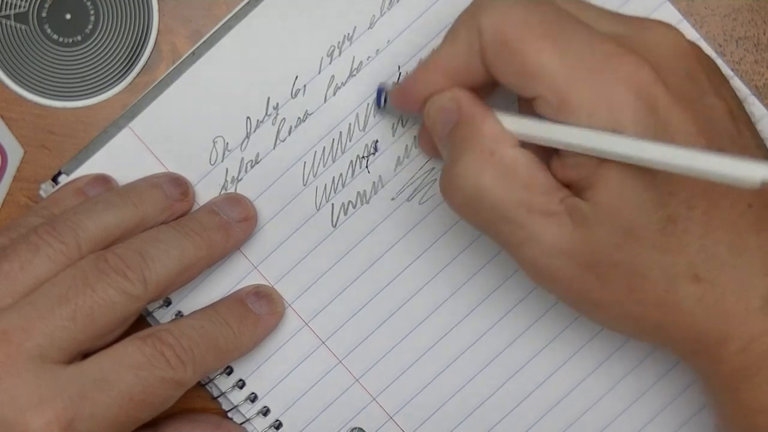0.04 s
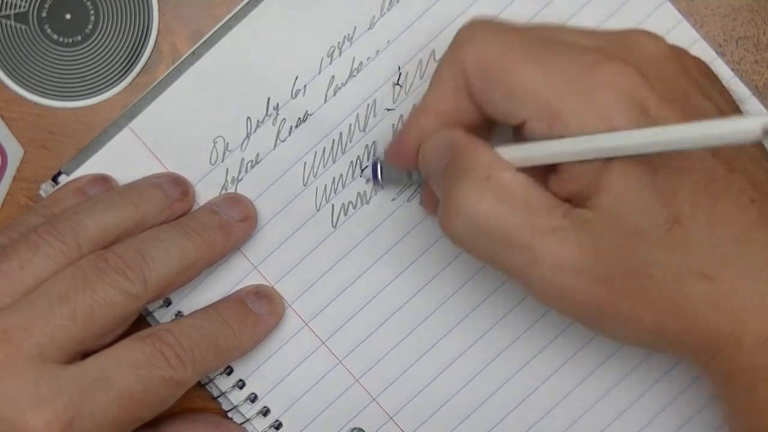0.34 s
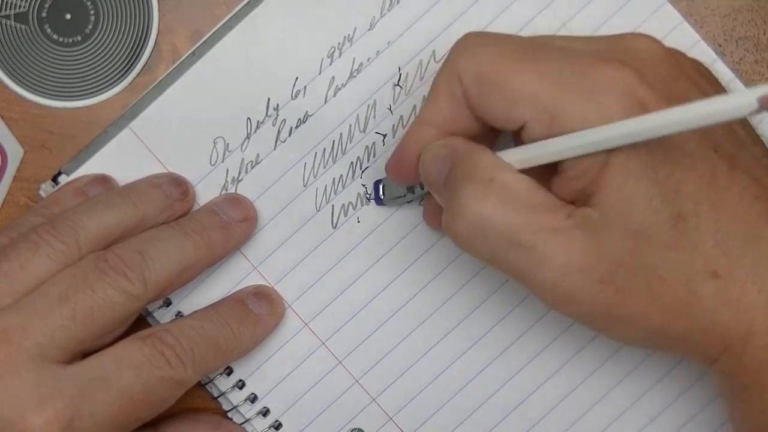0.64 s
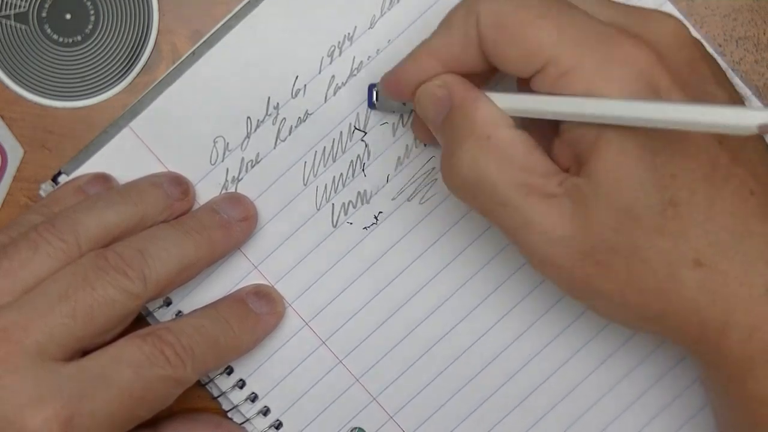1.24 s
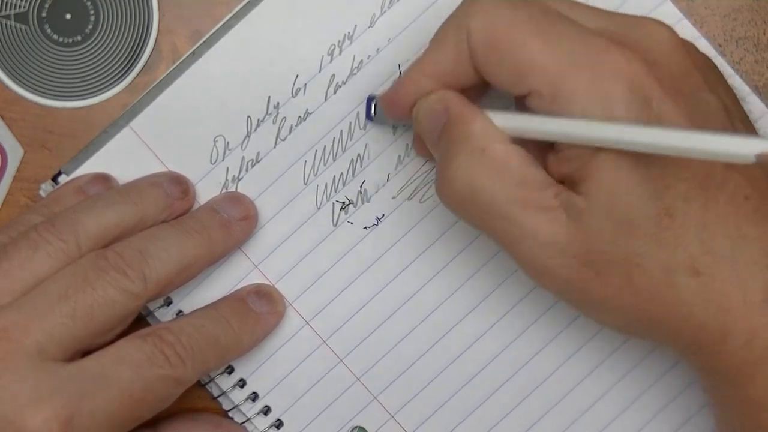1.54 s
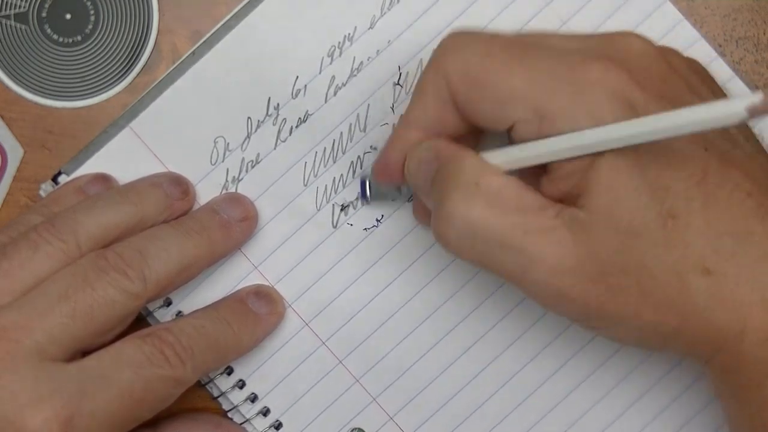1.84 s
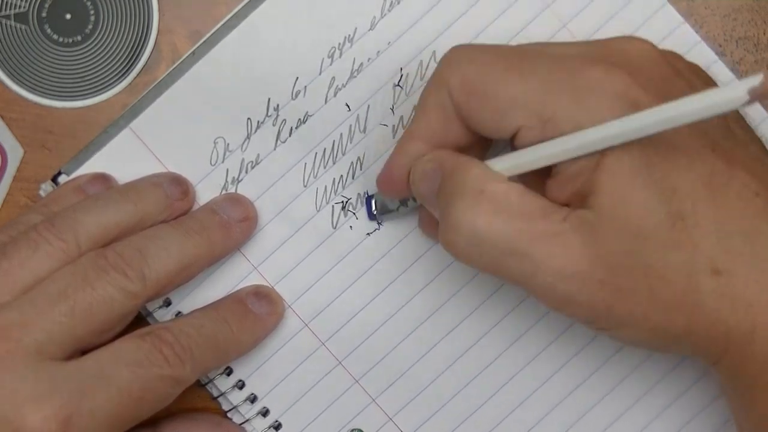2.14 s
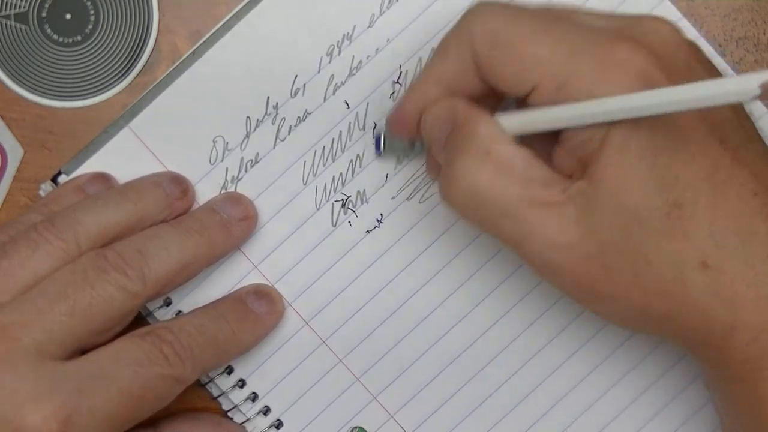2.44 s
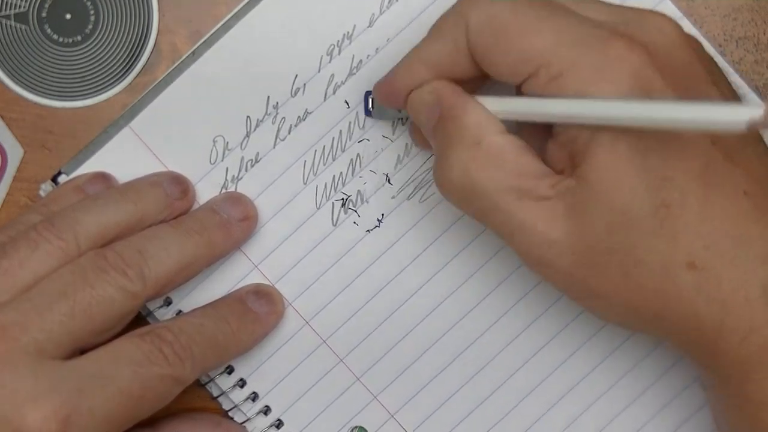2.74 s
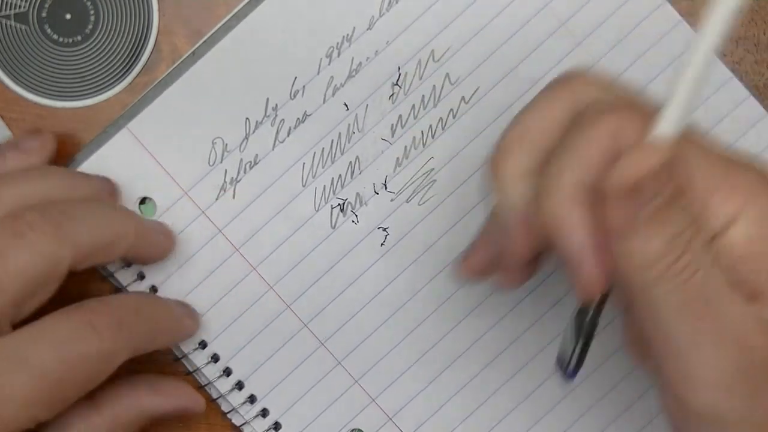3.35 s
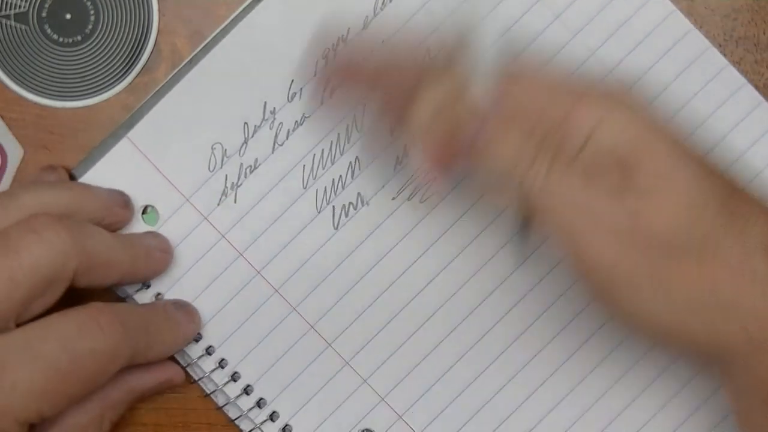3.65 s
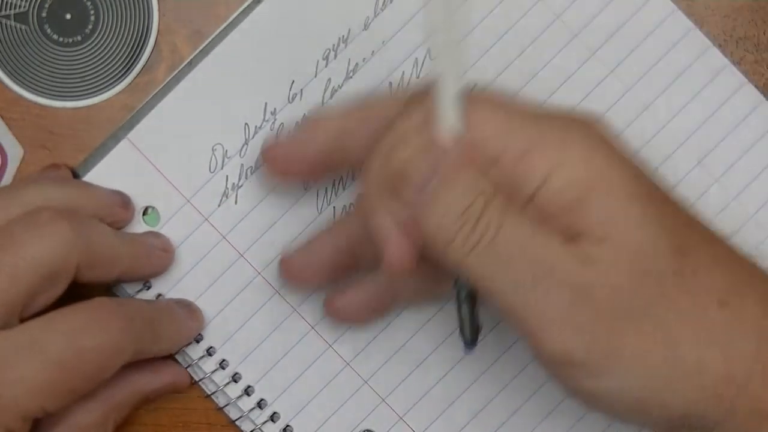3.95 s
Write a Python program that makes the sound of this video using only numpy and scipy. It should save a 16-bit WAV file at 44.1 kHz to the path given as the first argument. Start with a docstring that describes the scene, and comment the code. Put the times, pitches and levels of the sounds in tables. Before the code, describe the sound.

Quick back-and-forth erasing on paper, ending with one brisk brush of a hand.

```python
"""A notebook on a desk in a small, quiet room, with a stereo microphone close to the page.
For three seconds a pencil eraser rubs back and forth, eight strokes a second: pushes rasp and ring
the page, pulls rasp and squeak faintly. Meanwhile the desk thuds softly under the hand and the paper
snags. The rubbing stops, skin slides on the page and the pencil clicks twice in the fingers.
Last, one quick sweep of the hand brushes the crumbs away, a hiss and then a low boom."""
import sys
import numpy as np
from scipy import signal
from scipy.fft import rfft, irfft
from scipy.io import wavfile
from scipy.ndimage import uniform_filter1d

SR = 44100
rng = np.random.default_rng(int(sys.argv[2]) if len(sys.argv) > 2 else 0)


def generate_wav(signal):
    """Clip the signal to [-1, 1] and save it as 16-bit WAV at the path in sys.argv[1]."""
    frames = np.transpose(np.atleast_2d(signal))
    scaled = np.clip(frames, -1, 1) * 32767
    pcm = np.round(scaled).astype(np.int16)
    wavfile.write(sys.argv[1], SR, pcm)


N = 176400
T, HZ = np.arange(N) / SR, np.fft.rfftfreq(N, 1 / SR)

# Pulls of the eraser. Each row: start in seconds, relative squeak level in dB, squeak pitch in Hz.
PULLS = [(-.04, -67.5, 3194), (0.214, -64.5, 3190), (0.467, -62.5, 3234), (0.719, -63.5, 3216),
         (0.97, -67.5, 3140), (1.214, -62.5, 3170), (1.452, -62, 3200), (1.72, -60.5, 3220),
         (1.978, -63.5, 3140), (2.221, -63.5, 3110), (2.46, -62, 3130), (2.695, -60, 3150),
         (2.93, -63.5, 3150)]
# Pushes of the eraser. Each row: start in seconds, rasp level in dB.
PUSHES = [(0.091, -55.5), (0.341, -54.5), (0.594, -55.5), (0.846, -54.5), (1.086, -52.5), (1.334, -54.5),
          (1.597, -55.5), (1.842, -54.5), (2.096, -52.5), (2.344, -55.5), (2.579, -54.5), (2.814, -54.5),
          (3.058, -54.5)]
PULL_S, PUSH_S, PULL_DB = .076, .074, -57.3  # stroke lengths, and the rasp of a pull
LEAD_S, LAG_S = .011, .014  # the rubber also moves just before and after each stroke
SQUEAK_GLIDE = .6  # rise in pitch, as a share per second

# Tone colours of the noises. Each row: frequency in Hz, relative spectral density in dB.
HUSH_COLOUR = [(22, -15), (40, 2.5), (170, 1), (300, -0.5), (1500, -10.5), (8000, -19.5), (12000, -30),
               (15700, -28)]
PULL_COLOUR = [(60, -20), (330, 6), (950, 1.5), (1450, 6), (2200, 1), (2900, 1), (3900, -1.5), (7500, -2),
               (11000, 0.5), (13000, -5), (15700, -21)]
PUSH_COLOUR = [(60, -22), (330, 4.5), (580, -0.5), (750, 2), (1450, -1.5), (2900, 0), (5800, -1),
               (6550, -3.5), (8500, -1), (10200, 3.5), (11400, -4), (12400, 0), (13200, -6.5), (15700, -12)]
GRATE_COLOUR = [(100, -26), (700, -4.5), (1220, -2.5), (1650, -7.5), (1870, 9), (2200, -16.5), (2660, 4),
                (3400, -11.5), (5000, -24.5), (10000, -5), (15700, -20.5)]
SLIDE_COLOUR = [(60, -11), (300, -1.5), (450, 7.5), (1100, 2.5), (2000, -1), (4000, -2.5), (7000, -6),
                (11500, -7), (15700, -17)]
TICK_COLOUR = [(300, -25), (1900, -12), (2600, 0), (4000, 3), (8000, -8), (11000, -12), (15700, -20)]
HISS_COLOUR = [(200, -38), (1200, -1.5), (2500, 3), (4400, 2), (6600, -2.5), (9400, 5), (12000, 3),
               (14000, -3.5), (15700, -8)]
WEIGHT_COLOUR = [(60, -18), (170, -4), (330, -12), (520, -5), (630, -9), (750, -1.5), (1120, -8.5),
                 (1450, -7.5), (2050, -2.5), (2750, -8), (3650, -9), (4400, -9.5), (7000, -15),
                 (15000, -36)]

# Modes of the things on the desk. Each row: frequency in Hz, relative level in dB, seconds to fall 60 dB.
RUBBED_PAGE_MODES = [(750, -1.5, 0.036), (1030, -3, 0.042), (1230, 1, 0.034), (1983, 1, 0.034),
                     (2625, -1, 0.023)]
DESK_MODES = [(130, -10, 0.08), (174, 0, 0.105), (276, -14, 0.05), (423, -5, 0.09)]
PENCIL_MODES = [(2540, 1, .02), (3470, -6, 0.016)]
KNOCK_MODES = [(440, -10, .12), (540, -9, 0.12), (760, -13, .04)]
SWEPT_PAGE_MODES = [(1680, -4, 0.22), (1860, 0, 0.3), (2047, -2, 0.26), (2190, -2, 0.25), (3555, -5, .12)]

# Thuds of the hand and clicks of the pencil. Each row: start in seconds, strength in dB.
THUDS = [(.243, -51), (.49, -52.5), (0.618, -50.5), (0.714, -49), (.988, -46.5), (1.012, -51),
         (1.081, -52.5), (2.09, -50), (2.224, -47), (2.357, -48), (2.953, -50), (3.052, -45.5),
         (3.123, -46.5), (3.194, -48.5), (3.256, -47), (3.455, -44), (3.561, -47.5)]
CLICKS = [(3.453, -42.5), (3.471, -52.5)]
# Paper snags. Each row: start in seconds, level in dB, centre in Hz, decay time in seconds.
SNAGS = [(.146, -48, 1000, 0.0055), (.396, -50, 940, 0.0087), (.9, -50.5, 1100, 0.006),
         (1.138, -49, 1150, .008), (2.158, -45, 7000, .003), (2.595, -50, 9980, 0.0054),
         (2.835, -47.5, 10000, .004), (2.857, -50.5, 1180, 0.009), (3.084, -48, 2500, 0.0023),
         (3.116, -44, 5700, 0.0042), (3.312, -49, 2000, 0.0025), (3.561, -49, 2000, 0.0042),
         (3.708, -24, 2900, 0.0018), (3.9, -56.5, 10000, .005)]

# The hand's slide and the three layers of its sweep. Each row: time in seconds, relative level in dB.
SLIDE_LEVEL = [(0, -65.5), (3.15, -63.5), (3.2, -55.5), (3.245, -59), (3.33, -56), (3.39, -61.5),
               (3.555, -60), (3.575, -55.5), (3.8, -62), (4, -67.5)]
HISS_LEVEL = [(3.56, -74), (3.61, -55.5), (3.64, -43.5), (3.665, -38), (3.688, -31), (3.712, -35.5),
              (3.73, -49.5), (3.76, -60), (3.83, -68)]
WEIGHT_LEVEL = [(3.58, -61.5), (3.655, -63), (3.683, -38.5), (3.709, -32), (3.72, -33.5), (3.73, -46.5),
                (3.77, -54), (3.83, -67)]
BOOM_LEVEL = [(3.555, -72), (3.575, -54), (3.62, -59), (3.655, -76), (3.685, -52), (3.703, -39.5),
              (3.722, -41), (3.745, -60), (3.8, -72)]
# The hollow under the hand. Each row: open pitch in Hz, closed pitch in Hz, width in Hz, gain in dB.
HOLLOW_RESONANCES = [(1503, 2150, 560, -4.3), (3097, 3740, 480, -6.3)]
CLOSE_FROM_S, CLOSE_TO_S = 3.682, 3.708

# The room's tail. Each row: frequency in Hz, seconds to fall 60 dB.
ROOM_DECAY = [(150, 0.59), (1000, 0.3), (8000, 0.38), (15000, 0.13)]
# Stereo image at the microphone. Each row: frequency in Hz, left-right likeness from -1 to 1.
WIDE_IMAGE = [(130, 0.17), (300, -0.55), (15000, -0.32)]
RUB_IMAGE = [(100, .2), (300, -0.55), (1400, 0.35), (3100, 0.92), (15000, 0.69)]
NARROW_IMAGE = [(3100, 1), (7000, 0.78)]
# The microphone's balance. Each row: frequency in Hz, left minus right in dB.
BALANCE = [(60, 4.5), (400, 1.1), (7500, 0), (15000, -4)]


def amp(db):
    """Decibels to gain."""
    return 10 ** (np.asarray(db) / 20)


def unit(x):
    """Scales to rms 1."""
    return x / np.sqrt(np.mean(x ** 2) + 1e-20)


def read(points, hz=HZ):
    """Reads a table on a log-frequency axis."""
    f, value = np.transpose(points)
    return np.interp(np.log(hz + 1), np.log(f + 1), value)


def level(points):
    """Gain over time from (s, dB) points, silent outside them."""
    s, db = np.transpose(points)
    return amp(np.interp(T, s, db)) * (T >= s[0]) * (T <= s[-1])


def add(mix, start, sound):
    """Mixes a sound in at a time in seconds."""
    part = mix[..., max(round(start * SR), 0):][..., :sound.shape[-1]]
    part += sound[..., :part.shape[-1]]


def wander(hz):
    """Random drift of rms 1, mostly slower than hz."""
    return unit(irfft(rfft(rng.standard_normal(N)) / (1 + (HZ / hz) ** 4), N))


def stereo(x, image, colour_db=0):
    """Colours two unrelated signals and blends them to a given left-right likeness."""
    mid, side = rfft(x) * amp(colour_db)
    likeness = np.clip(read(image), -.99, .99)
    mid, side = mid * np.sqrt(1 + likeness), side * np.sqrt(1 - likeness)
    return unit(irfft(np.array([mid + side, mid - side]), N))


def noise_band(hz, width_hz):
    """Noise in one resonance that follows a pitch curve."""
    shiver = np.array([wander(width_hz / 2) + 1j * wander(width_hz / 2) for _ in range(2)])
    return stereo((shiver * np.exp(2j * np.pi * np.cumsum(hz) / SR)).real, NARROW_IMAGE)


def ring(force, modes):
    """Passes a force through decaying modes."""
    t = T[:SR // 2]
    response = sum(amp(db - 60 * t / t60) * np.cos(2 * np.pi * hz * t) for hz, db, t60 in modes)
    return signal.fftconvolve(force, response[None], axes=1)[:, :N]


def hush():
    """Room tone: low, wide and steady."""
    return amp(-61) * stereo(rng.standard_normal((2, N)), WIDE_IMAGE, read(HUSH_COLOUR))


def friction(colour, image, grain_db, chatter_db, chatter_hz):
    """Countless fibres catch and let go, in uneven clumps."""
    size = amp(grain_db * np.minimum(rng.exponential(1, N), 6))
    slips = rng.standard_normal((2, N)) * size * amp(chatter_db * wander(chatter_hz))
    return stereo(slips, image, read(colour))


def stroke(start, length, break_s):
    """Speed of one stroke, an arch, and the grip of the rubber, which bites early and eases."""
    age = np.maximum(T - start, 0)
    progress = np.clip((T - start + LEAD_S) / (length + LEAD_S + LAG_S), 0, 1)
    speed = np.maximum(np.sin(np.pi * progress ** .88), 0)
    grip = np.minimum(age / break_s, 1) * np.exp(-age / .055) * (1 - progress ** 4)
    return speed, grip


def mottle(x, depth_db):
    """The colour shifts in patches as the contact moves over the paper."""
    spectra = signal.stft(x, nperseg=256)[2]
    patches = uniform_filter1d(rng.standard_normal(spectra.shape[1:]), size=5, axis=0)
    patches = uniform_filter1d(patches, size=12, axis=1)
    return signal.istft(spectra * amp(depth_db * unit(patches)), nperseg=256)[1][:, :N]


def squeak(pitch, speed):
    """Fast, uneven stick-slip of the rubber; its pitch rises a little with speed."""
    return noise_band(pitch * (1 + .041 * (speed - 1) + .016 * wander(59.6)), width_hz=305)


def eraser():
    """Strokes grate, then rasp; pushes ring the page, pulls squeak. Gives the sound and the speed."""
    pull, push, grate, squeak_gain, pitch, motion = np.zeros((6, N))
    for start, squeak_db, squeak_hz in PULLS:
        speed, grip = stroke(start, PULL_S, break_s=.014)  # a pull starts softly
        pull += amp(PULL_DB) * speed ** 1.08
        squeak_gain += amp(squeak_db + 4) * speed ** 2.5
        glide = 1 + SQUEAK_GLIDE * (T - start - PULL_S / 2)
        pitch = np.where(T > start - LEAD_S, squeak_hz * glide, pitch)
        grate += amp(PULL_DB) * grip
        motion += speed
    for start, db in PUSHES:
        speed, grip = stroke(start, PUSH_S, break_s=.0034)  # a push breaks loose at once
        push += amp(db) * speed ** 1.08
        grate += amp(db - 3) * grip
        motion += speed
    pull, push, grate = [
        force * friction(colour, RUB_IMAGE, grain_db=2.9, chatter_db=1.2, chatter_hz=170)
        for force, colour in ((pull, PULL_COLOUR), (push, PUSH_COLOUR), (grate, GRATE_COLOUR))]
    rub = mottle(pull + push + grate, depth_db=1.64)
    treble = irfft(rfft(rub) * HZ ** 4 / (HZ ** 4 + 5500 ** 4), N)
    fizz = amp(-.2) * motion ** .53 * treble  # the treble needs speed, so it swells later
    page = amp(-10.5) * push.std() * unit(ring(push, RUBBED_PAGE_MODES))
    return rub - treble + fizz + page + squeak_gain * squeak(pitch, motion), motion


def desk(motion):
    """The desk rumbles until the sweep ends, more with each stroke, and thuds under the hand."""
    rumble = stereo(ring(rng.standard_normal((2, N)), DESK_MODES), WIDE_IMAGE)
    out = amp(-69) * rumble * ((T < BOOM_LEVEL[-1][0]) + motion)
    press = np.sin(np.pi * np.minimum(T[:1024] / .003, 1)) ** 2  # a soft 3 ms push
    for start, db in THUDS:
        shift = 1 + .07 * rng.uniform(-1, 1)  # each lands elsewhere and shifts the desk's notes
        modes = [(hz * shift, mode_db, t60) for hz, mode_db, t60 in DESK_MODES]
        add(out, start, amp(db) * ring(press[None] / press.sum(), modes))
    return out


def hand_slide():
    """Skin slides on the page, faintly at first and louder once the rubbing stops."""
    skin = friction(SLIDE_COLOUR, RUB_IMAGE, grain_db=2, chatter_db=2, chatter_hz=59.6)
    return level(SLIDE_LEVEL) * skin


def snags():
    """Short snaps of the paper, each a broad band of noise that dies at once."""
    out, t = np.zeros((2, N)), T[:4096]
    hz = np.fft.rfftfreq(len(t), 1 / SR)
    for start, db, centre, decay in SNAGS:
        noise = rng.standard_normal(len(t)) + .2 * rng.standard_normal((2, len(t)))
        band = 1 / np.hypot(1, 1.17 * (hz / centre - centre / (hz + 1)))
        snap = unit(irfft(rfft(noise) * band))
        add(out, start, amp(db) * snap * np.exp(-t / decay))
    return out


def pencil():
    """The pencil is turned: a light tick, a brief ring and a dull knock against the fingers."""
    ticks, blows, knocks = np.zeros((3, 2, N))
    for start, db in CLICKS:
        impulse = amp(db) * np.ones(1)
        add(ticks, start, amp(db - 1.5) * np.exp(-T[:2048] / .0037))
        add(blows, start, impulse)
        add(knocks, start + .004, impulse)  # the fingers take up the blow a moment later
    tick_noise = stereo(rng.standard_normal((2, N)), NARROW_IMAGE, read(TICK_COLOUR))
    return ticks * tick_noise + ring(blows, PENCIL_MODES) + ring(knocks, KNOCK_MODES)


def desk_boom():
    """The desk's strongest note booms unevenly under the sweep."""
    pitch = DESK_MODES[1][0] * (1 + .07 * wander(88))
    return level(BOOM_LEVEL) * unit(np.sin(2 * np.pi * np.cumsum(pitch) / SR))


def hand_sweep():
    """Light skin hiss first, then the weight of the hand, which sets the notebook ringing."""
    hiss = friction(HISS_COLOUR, NARROW_IMAGE, grain_db=2.5, chatter_db=.7, chatter_hz=200)
    drag = friction(WEIGHT_COLOUR, NARROW_IMAGE, grain_db=2.5, chatter_db=1, chatter_hz=200)
    # The hollow under the hand shrinks as it lands, so its resonances rise.
    closing = np.clip((T - CLOSE_FROM_S) / (CLOSE_TO_S - CLOSE_FROM_S), 0, 1)
    hollow = sum(amp(db) * noise_band(open_hz + (closed_hz - open_hz) * closing, width_hz)
                 for open_hz, closed_hz, width_hz, db in HOLLOW_RESONANCES)
    weight = level(WEIGHT_LEVEL) * (amp(-2.5) * drag + hollow)
    page = amp(-21) * weight.std() * unit(ring(weight, SWEPT_PAGE_MODES))
    return level(HISS_LEVEL) * hiss + weight + page


def room(x, bounce_s=.0038, tail_db=-12.5):
    """One dull bounce between desk and microphone, and the small room's short diffuse tail."""
    hz, t, spectra = signal.stft(rng.standard_normal((2, SR // 2)), SR, nperseg=256)
    envelope = amp(-60 * t / read(ROOM_DECAY, hz)[:, None]) * np.minimum(t / .0048, 1)
    tail = signal.istft(spectra * envelope, SR, nperseg=256)[1]
    wet = signal.fftconvolve(x, tail / np.linalg.norm(tail[0]), axes=1)[:, :N]
    bounce = irfft(rfft(x) * np.exp(-2j * np.pi * HZ * bounce_s) / (1 + (HZ / 4000) ** 2), N)
    return x + .14 * bounce + amp(tail_db) * wet


def scene():
    """Everything at the desk, heard from close by over the room tone."""
    rub, motion = eraser()
    room_tone = hush()
    at_desk = rub + desk(motion) + desk_boom() + snags() + pencil() + hand_slide() + hand_sweep()
    return room(at_desk) + room_tone


def record(dry, left_lead_s=6e-6, low_cut_hz=13, top_hz=15780):
    """The microphone: two closely spaced ports, a low cut, then the band limit."""
    sides = np.array([[.5], [-.5]])
    ports = amp(read(BALANCE)) ** sides * np.exp(2j * np.pi * HZ * left_lead_s * sides)
    heard = irfft(rfft(dry) * ports * HZ ** 4 / (HZ ** 4 + low_cut_hz ** 4), N)
    band_limit = signal.firwin(1023, top_hz, window=("kaiser", 9), fs=SR)
    return signal.oaconvolve(heard, band_limit[None], "same")


dry = scene()
out = record(dry)
generate_wav(out)
```